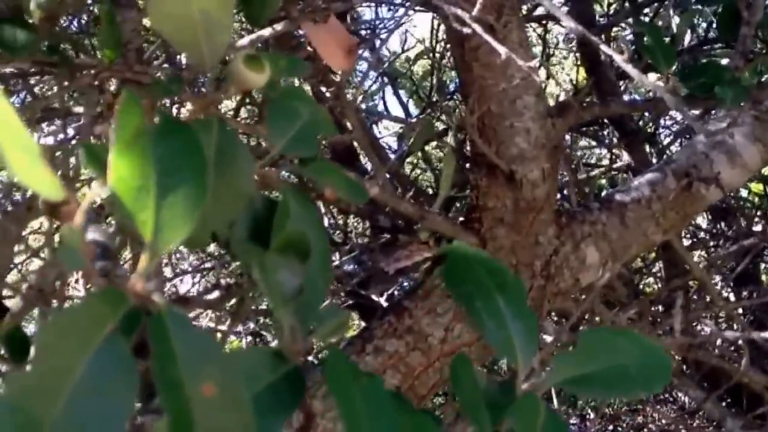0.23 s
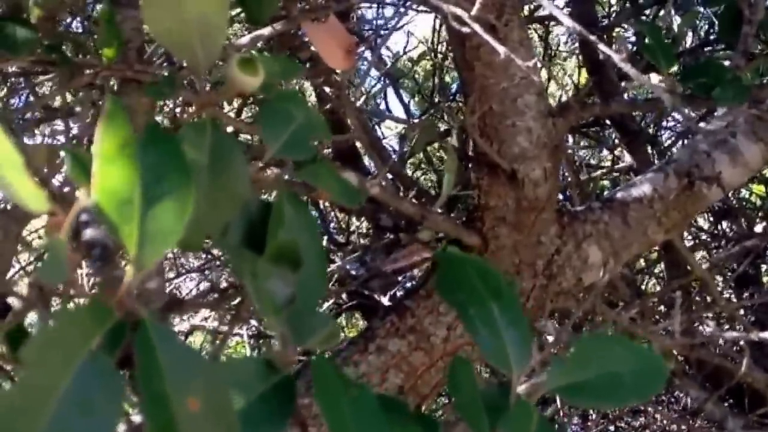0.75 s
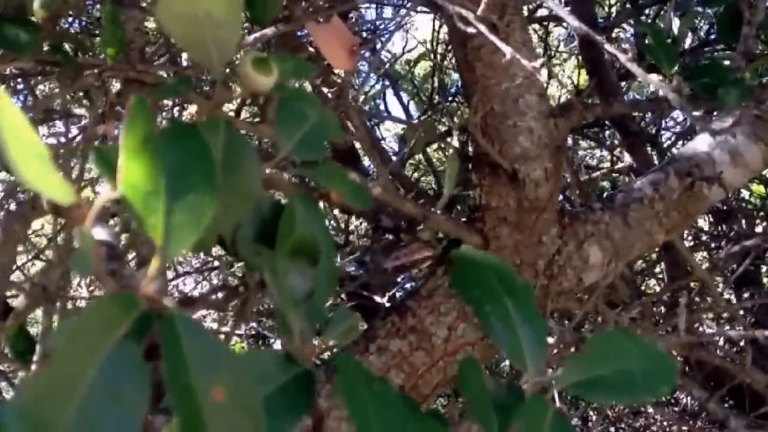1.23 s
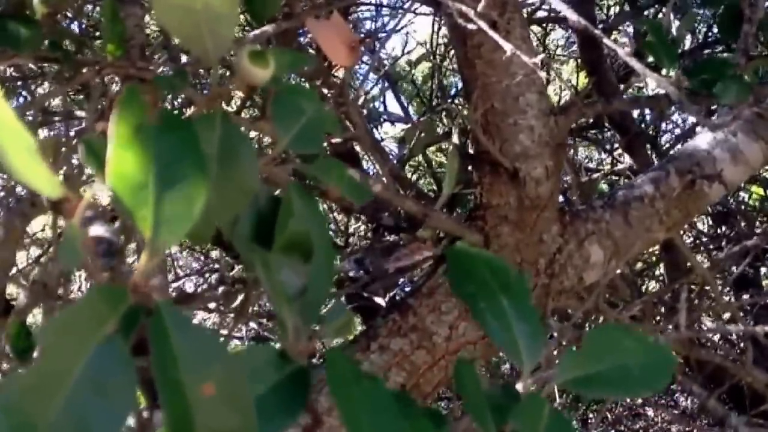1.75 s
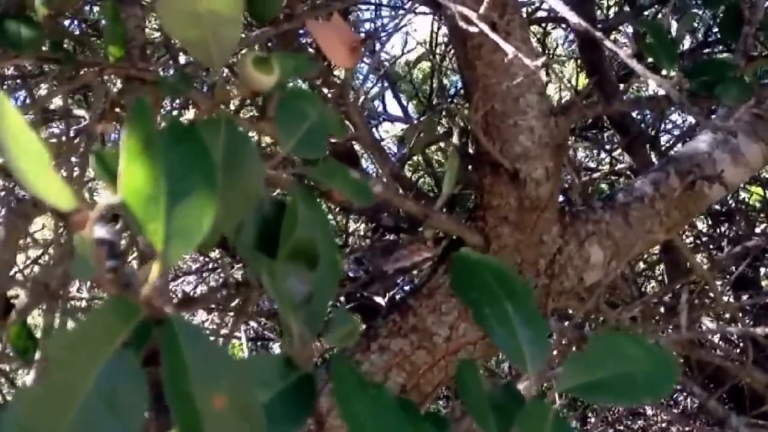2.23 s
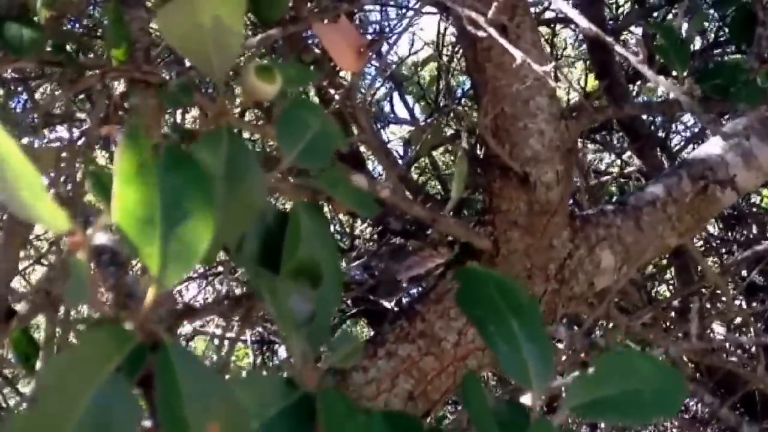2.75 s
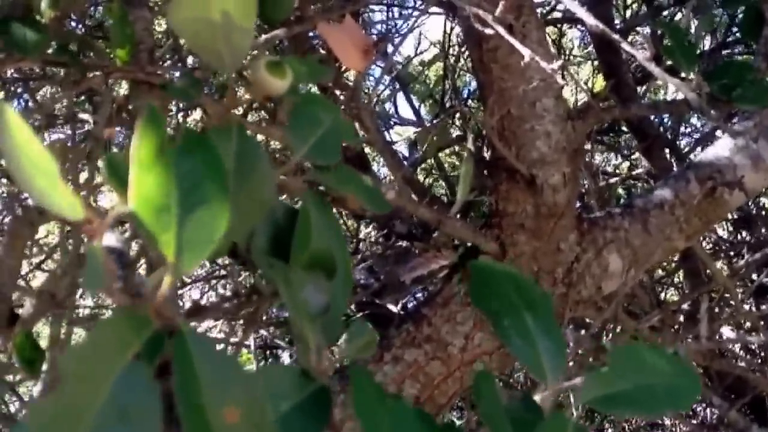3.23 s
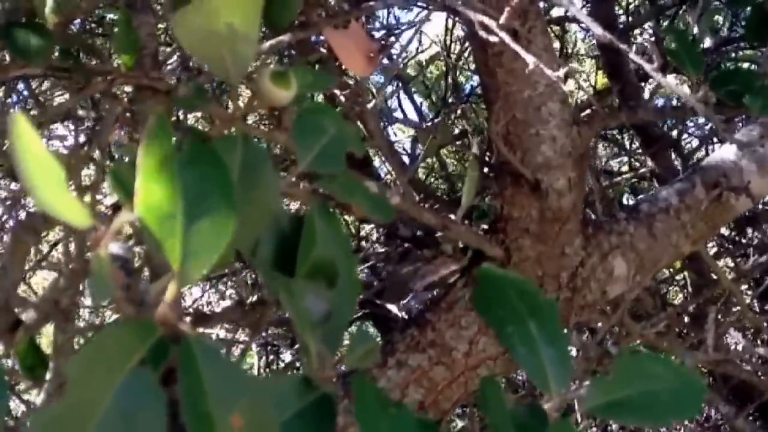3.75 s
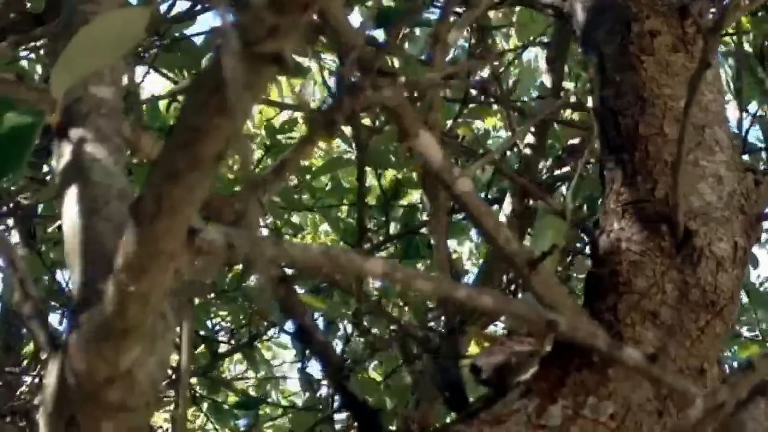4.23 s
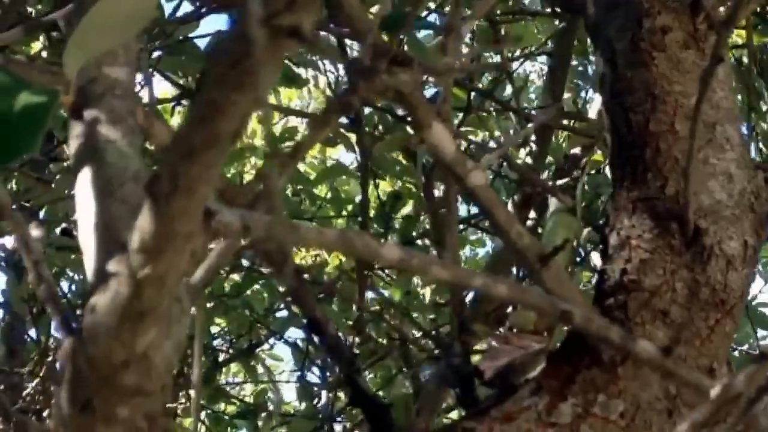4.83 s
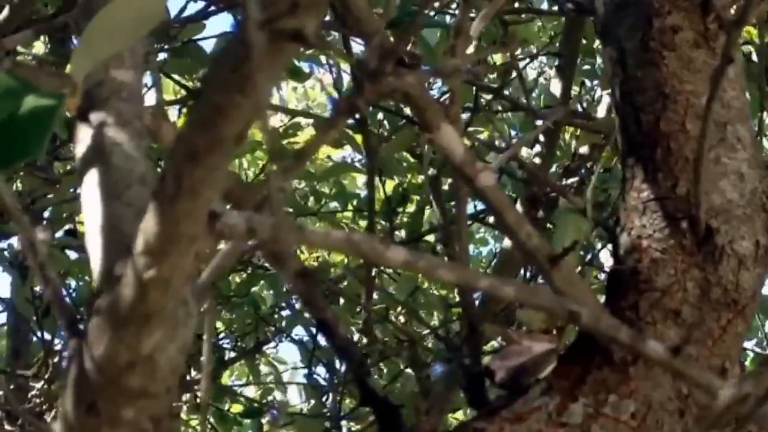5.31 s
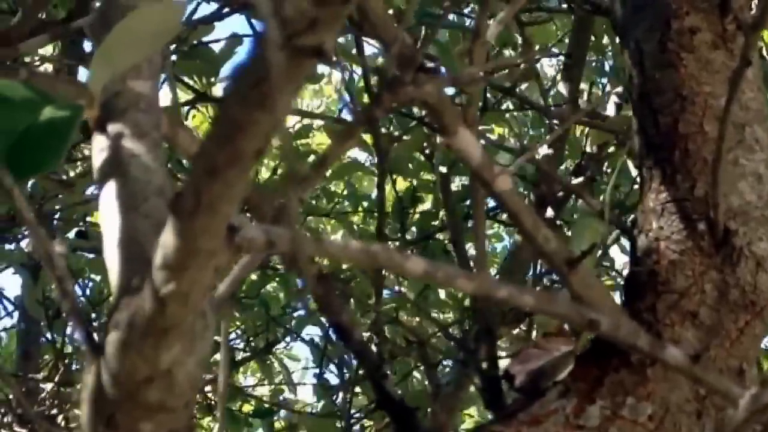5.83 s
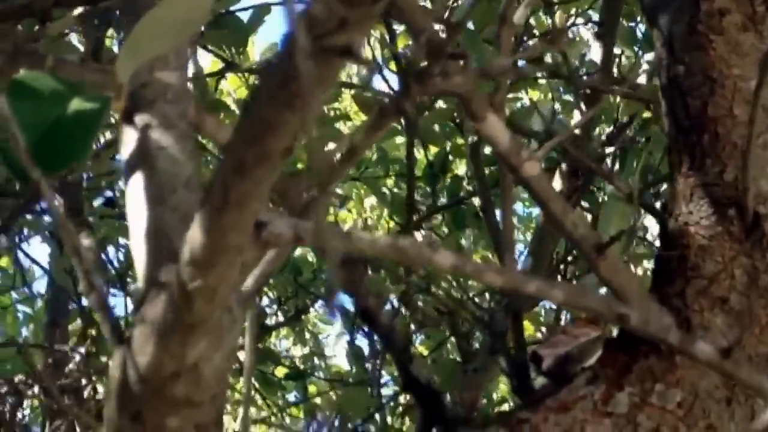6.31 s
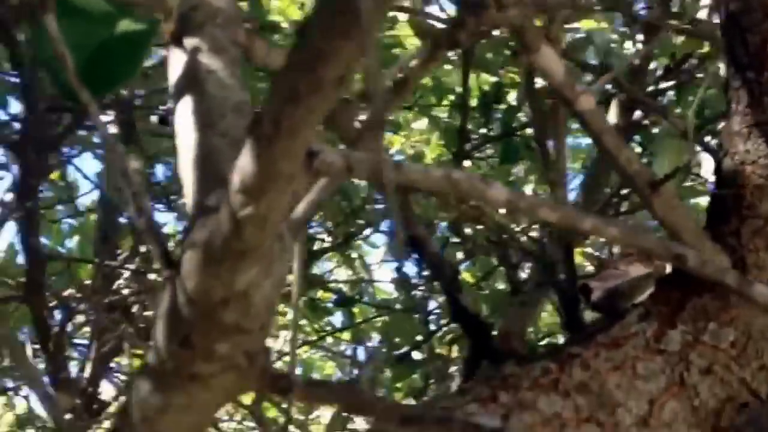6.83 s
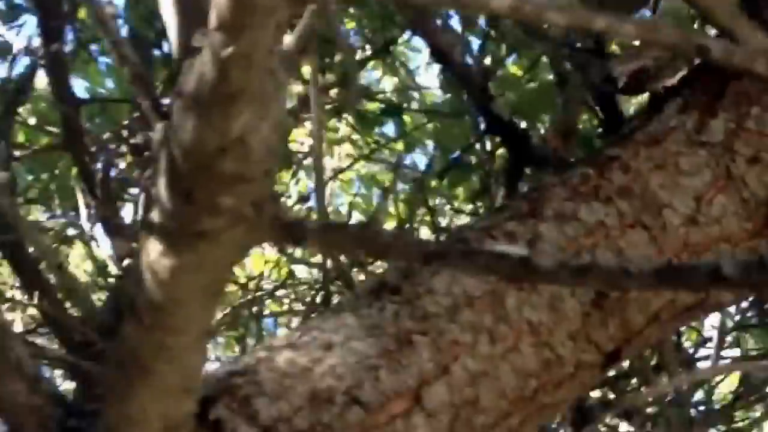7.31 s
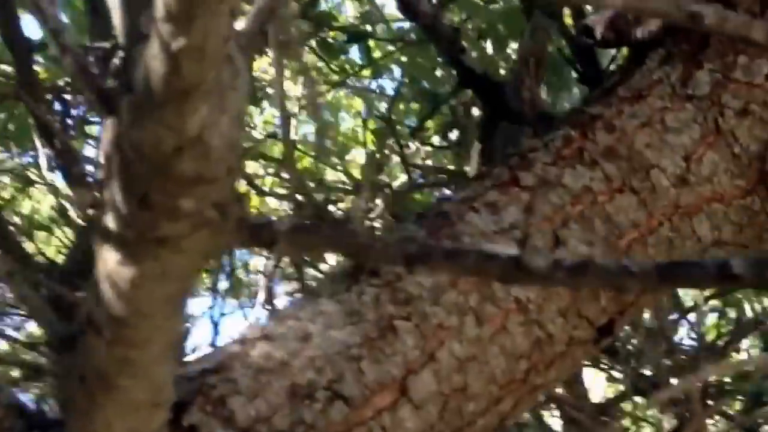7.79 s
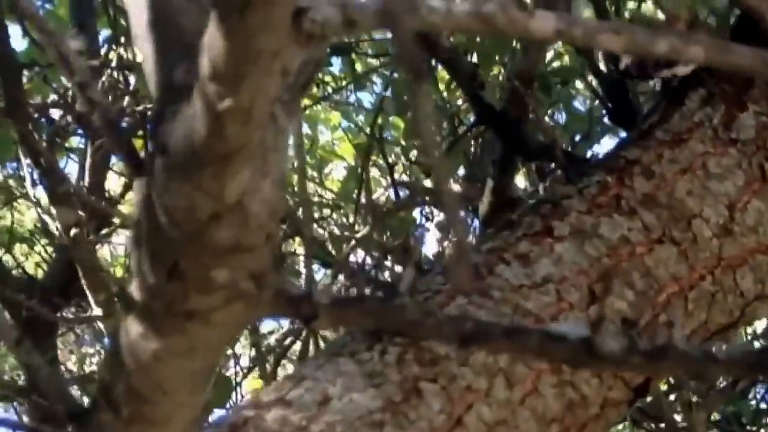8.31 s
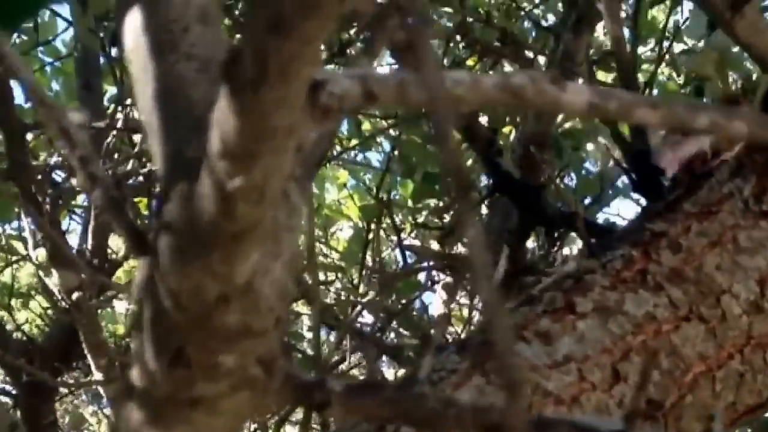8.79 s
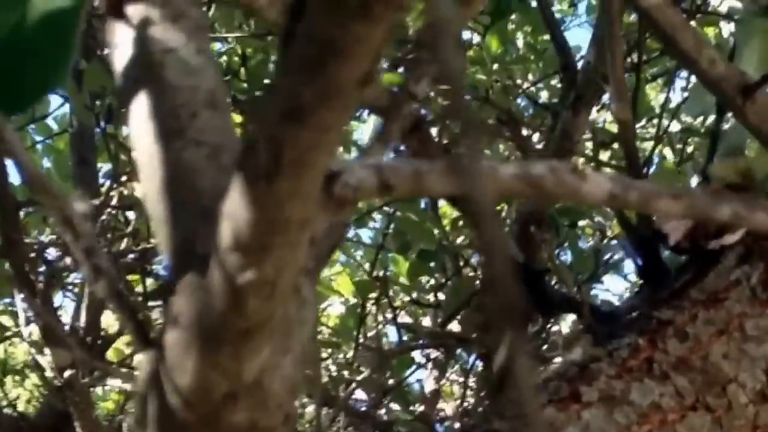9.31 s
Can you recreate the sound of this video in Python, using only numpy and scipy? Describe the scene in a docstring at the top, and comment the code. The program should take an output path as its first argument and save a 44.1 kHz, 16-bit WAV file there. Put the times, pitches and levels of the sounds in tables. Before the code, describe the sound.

Close, shrill cicada buzzing sputters out and returns as a loud scream, amid wing flicks, snapping twigs and light wind on the microphone.

```python
"""A cicada caught in a tree buzzes, breaks into stutters, then screams close to the microphone.
Its two tymbals buckle rib by rib, each rib a ringing click; wings flick the bark and branches
scatter the sound. Twigs snap, wind bumps the microphone, a far engine hums over the outdoor wash.
All sound drops out briefly near 4 s."""
import sys
import numpy as np
from scipy import signal
from scipy.fft import rfft, irfft, next_fast_len
from scipy.io import wavfile
from scipy.ndimage import uniform_filter1d

SR = 44100
rng = np.random.default_rng(int(sys.argv[2]) if len(sys.argv) > 2 else 0)


def unload_wav(signal):
    """Save mono or channel-first audio to the path in sys.argv[1] as 16-bit WAV at rate SR, clipped to [-1, 1]."""
    wavfile.write(
        sys.argv[1],
        SR,
        np.round(np.clip(np.atleast_2d(signal).T, -1, 1) * 32767).astype(np.int16),
    )


N = 421155
TIME = np.arange(N) / SR
DROPOUT_START_S, DROPOUT_END_S = 3.988, 4.034

# outdoor wash spectrum: freq_hz, gain_db
WASH_SPECTRUM = [(25, -34), (60, -20.5), (110, -7), (200, -4), (300, -0.5), (420, -1.5), (560, -9.5),
                 (1000, -9.5), (1500, -13), (2300, -19.5), (5000, -25), (7500, -24.5), (10000, -32.5),
                 (15000, -33.5)]
# narrow humps on it: centre_hz, width_hz, gain_db
WASH_HUMPS = [(362, 4.4, 6.5), (739, 49, 8.4)]
# wind bumps on the microphone: centre_s, level_db, width_s
GUSTS = [(0.325, -33, .012), (.946, -41.5, 0.031), (1.055, -30.5, 0.024), (1.85, -42.5, .038),
         (1.968, -36, .025), (2.096, -36, 0.015), (2.545, -30.5, 0.032), (2.629, -30.5, .028),
         (3.08, -38, .03), (3.186, -33.5, 0.017), (3.28, -43.5, .04), (5.222, -47.5, .03),
         (6.27, -43, 0.033)]
# far engine: time_s, pitch_hz, level_db
ENGINE_CURVE = [(4.8, 136, -72), (5.1, 130.5, -56), (5.45, 124.5, -56), (7.05, 132.5, -51.5),
                (9.0, 145.2, -56.5), (9.3, 145, -70)]
# echoes off nearby branches: delay_s, gain_db
BRANCH_ECHOES = [(.0031, -18), (.0052, -22.5)]
# twig snaps: start_s, level_db, ring_hz, relative_crack_db
TWIG_SNAPS = [(6.364, -12.5, 1380, -17), (6.4152, -20.5, 1500, -11), (6.4619, -17, 1620, -15),
              (6.555, -24, 891, -5), (7.001, -1.5, 1060, -27), (7.027, -21.5, 1400, -8),
              (7.304, -17, 1000, -8), (7.309, -6.5, 1820, -11), (7.319, -17, 1600, -12)]
# bouts of wing flicks: start_s, level_db, flick_count, spacing_s
WING_BOUTS = [(.3172, -22, 4, .0248), (.4394, -19, 1, 0), (.8894, -22, 1, 0), (1.0405, -16, 1, 0),
              (1.1194, -19, 2, .0249), (3.503, -32.5, 3, .0157), (3.945, -30, 3, .0148),
              (8.3494, -15, 1, 0), (8.5875, -14, 1, 0), (8.8771, -17, 1, 0), (9.0992, -14.5, 1, 0)]

# ribs of one stroke (quick tymbal, slow, slow at full effort): delay_s, gain_db, pitch_ratio, treble_db
QUICK_RIBS = [(0, -2.5, 0.986, 0.5), (.00108, -0.5, 1.021, .5), (.00213, -1.5, .99, -3.5)]
SLOW_RIBS = [(0, -2, .96, 1), (.0019, -1, 1, 0), (.0033, -3.5, 1.04, -1)]
HARD_RIBS = [(0, 0, 1.003, 3), (.0018, -1, 0.996, -3.5), (.0036, -2, .99, 0.5)]
# click spectra through the abdomen (buzz and early stutters, late stutters, scream): freq_hz, gain_db
BUZZ_SPECTRUM = [(200, -66), (2200, -34), (2700, -11.5), (3100, -2.5), (3550, 1.5), (4750, 0), (5050, -12),
                 (5700, -14), (6850, -8.5), (7600, -12), (8250, -6), (10000, -20), (11300, -14.5),
                 (15300, -26)]
LATE_STUTTER_SPECTRUM = [(200, -70), (2250, -32), (2850, -12), (3400, -5), (3800, -6.5), (4600, -6),
                         (5100, -18.5), (7200, -16), (7700, -13.5), (8300, -10), (9200, -33),
                         (11000, -17.5), (14000, -19.5), (15300, -18)]
SCREAM_SPECTRUM = [(200, -64), (1400, -47.5), (2300, -23), (3100, -10.5), (3900, -6.5), (4750, -2),
                   (5150, -8), (6000, -17), (6800, -13.5), (7600, -14.5), (8100, -9.5), (9500, -26.5),
                   (12500, -19.5), (15300, -26.5)]

# short runs of strokes: start_s, stroke_count
STUTTER_RUNS = [(.001, 2), (.023, 3), (.064, 2), (.086, 2), (.13, 1), (1.338, 1), (1.357, 1), (2.626, 1),
                (2.642, 4), (2.683, 2), (2.714, 2), (2.764, 1), (2.825, 1), (3.564, 9), (3.905, 2),
                (4.035, 8), (4.1, 3), (4.132, 2), (4.164, 2), (4.188, 10), (4.271, 2), (4.294, 4),
                (4.329, 1), (4.345, 3), (4.378, 1), (4.396, 3), (4.426, 2), (4.47, 2), (4.6186, 1),
                (4.639, 6), (4.745, 1), (4.767, 1), (4.802, 1), (4.834, 1), (4.857, 1), (4.915, 1),
                (4.956, 1), (4.991, 1), (5.049, 1), (5.443, 1), (5.492, 1), (6.045, 1), (6.749, 2),
                (6.884, 1), (6.908, 4), (6.94, 1)]
# stutter strength: time_s, level_db
STUTTER_CURVE = [(.1, -28), (1.34, -27.5), (2.63, -32), (2.73, -28.5), (3.9, -28.5), (4.03, -22.5),
                 (4.9, -25), (5.4, -27), (6.9, -29)]
# buzz strength: time_s, level_db, treble_db
BUZZ_CURVE = [(.17, -32, -10), (.27, -29, -13), (.35, -25.5, -9.5), (.75, -22, -15.5), (.83, -25.5, -12),
              (1.08, -22.5, -9), (1.3, -23.5, -12.5), (1.44, -29.5, -12.5), (2.1, -29.5, -13),
              (2.63, -33.5, -12)]
# muscle pace of one tymbal in the buzz: time_s, stroke_rate_hz
BUZZ_PACE = [(.17, 84), (.35, 109), (.75, 116), (.81, 94), (.9, 113), (1.27, 115), (1.34, 92), (2.05, 90),
             (2.631, 72)]
# faster muscles pull the tymbals closer and steadier: stroke_rate_hz, lag_cycles, jitter_cycles
BUZZ_LOCKING = [(74.5, .48, .033), (99.9, .44, .03), (116, .35, .011)]
# both muscles stall, more often as they tire: start_s, end_s
BUZZ_STALLS = [(.786, 0.79), (1.318, 1.35), (2.24, 2.237), (2.278, 2.28), (2.354, 2.35), (2.469, 2.481),
               (2.491, 2.501), (2.617, 2.64)]
# scream strength and pace of one tymbal: time_s, level_db, treble_db, stroke_rate_hz
SCREAM_CURVE = [(6.95, -31, -10, 86), (7.03, -20.7, -14.5, 102), (7.13, -18, -17, 106.3),
                (7.7, -17, -15.5, 111.3), (8.3, -18, -15.5, 112.5), (8.67, -22.5, -16, 105),
                (9.15, -22, -16.5, 107), (9.45, -23.5, -16, 108), (9.55, -26.5, -12, 100)]
# lower resonance, gliding slowly: time_s, pitch_hz
SCREAM_GLIDE = [(6.98, 3110), (7.2, 3500), (7.72, 3380), (8.05, 3480), (8.25, 3250), (8.5, 3080),
                (9.1, 3100), (9.55, 3170)]
# tiring tymbals drift apart: time_s, lag_cycles, jitter_cycles, resonance_share
SCREAM_FATIGUE = [(8.2, .36, .0065, 1), (8.75, .42, .027, 0.64)]


def amp(db):
    return 10 ** (np.asarray(db) / 20)


def spectrum_at(points, hz):
    """Interpolate on a log-frequency axis."""
    freq_hz, value = np.transpose(points)
    return np.interp(np.log(hz + 1), np.log(freq_hz + 1), value)


def follow(rows, at):
    """Interpolate a table's other columns along its first."""
    axis, *columns = np.transpose(rows)
    return [np.interp(at, axis, column) for column in columns]


def add(mix, start_s, sound):
    part = mix[max(round(start_s * SR), 0):][:len(sound)]
    part += sound[:len(part)]


def hump(x, centre, width):
    return np.exp(-.5 * ((x - centre) / width) ** 2)


def noise(colour_db):
    """Unit-rms noise with spectrum colour_db(hz)."""
    size = next_fast_len(N)
    gain = amp(colour_db(np.fft.rfftfreq(size, 1 / SR)))
    x = irfft(rfft(rng.standard_normal(size)) * gain, size)[:N]
    return x / np.sqrt(np.mean(x ** 2) + 1e-20)


def drift(rate_hz):
    """Unit-rms wander below about rate_hz."""
    return noise(lambda hz: -40 * np.log10(1 + (hz / rate_hz) ** 2))


def lingering(shape, memory):
    """Random values correlated from one stroke (row) to the next."""
    fresh = rng.standard_normal(shape)
    return signal.lfilter([np.sqrt(1 - memory ** 2)], [1, -memory], fresh, axis=0, zi=memory * fresh[-1:])[0]


def wash(level_db=-46.5, swell_db=1.26):
    """Broad outdoor noise, swelling slightly."""
    def colour_db(hz):
        humps_db = sum(db * hump(hz, centre_hz, width_hz) for centre_hz, width_hz, db in WASH_HUMPS)
        return spectrum_at(WASH_SPECTRUM, hz) + humps_db
    return noise(colour_db) * amp(level_db + swell_db * drift(3.6))


def wind(breeze_db=-52.5, swing_db=2, breeze_end_s=3.35, lump_db=2.5):
    """An uneven breeze that drops; gusts bump the microphone."""
    breeze = amp(breeze_db + swing_db * drift(5.2)) * np.clip((breeze_end_s - TIME) * 10, 0, 1)
    gusts = sum(amp(db) * hump(TIME, centre_s, width_s) for centre_s, db, width_s in GUSTS)
    colour = [(30, -36), (70, -15.5), (125, .5), (190, 3.5), (300, -7), (600, -27.5), (2000, -50)]
    rumble = noise(lambda hz: spectrum_at(colour, hz))
    return rumble * np.hypot(breeze, gusts) * amp(lump_db * drift(28))


def engine(wobble=.0042, swing_db=1):
    """A far hum that sags, then slowly speeds up."""
    pitch_hz, level_db = follow(ENGINE_CURVE, TIME)
    cycles = np.cumsum(pitch_hz * (1 + wobble * drift(5.4))) / SR
    return np.sqrt(2) * amp(level_db + swing_db * drift(4)) * np.sin(2 * np.pi * cycles)


def canopy(x, near_db=-11, near_t60_s=.07, far_db=-29, far_t60_s=.59, sway_hz=.7, tails=4):
    """Two branches echo; leaves scatter a tail that changes as the microphone sways."""
    t, out = TIME[:SR // 3], x.copy()
    for delay_s, db in BRANCH_ECHOES:
        add(out, delay_s, amp(db) * x)
    decays = (t > .002) * amp(-60 * t / np.array([[near_t60_s], [far_t60_s]]))
    for k in range(tails):
        near, far = rng.standard_normal((2, len(t))) * decays
        tail = amp(near_db) * near / np.linalg.norm(near) + amp(far_db) * far / np.linalg.norm(far)
        sway = np.cos(2 * np.pi * sway_hz * (1 + k // 2) * TIME + k * np.pi / 2) * np.sqrt(2 / tails)
        out += signal.oaconvolve(x * sway, tail)[:N]
    return out


def twigs(ring_t60_s=.0044, crack_t60_s=.0089, upper_db=-8, upper_ratio=2.36):
    """Each snap: two heavily damped wood modes and a brief crack."""
    out, t = np.zeros(N), TIME[:1200]
    fade = amp(-60 * t / crack_t60_s)
    for start_s, db, ring_hz, crack_db in TWIG_SNAPS:
        phase = 2 * np.pi * ring_hz * t
        modes = np.sin(phase + 1) + amp(upper_db) * np.sin(phase * upper_ratio)
        crack = signal.lfilter([1], [1, -.75], rng.standard_normal(len(t))) * fade
        crack *= amp(crack_db - 3) * np.linalg.norm(fade) / np.linalg.norm(crack)
        add(out, start_s, amp(db) * (modes * amp(-60 * t / ring_t60_s) + crack))
    return signal.sosfilt(signal.butter(2, 620, "high", fs=SR, output="sos"), out)


def wings(t60_s=.042, trim_db=-3.5):
    """Dry scratches of a wing on bark, singly or in even bouts."""
    envelope, t = np.zeros(N), TIME[:2000]
    for start_s, db, count, spacing_s in WING_BOUTS:
        for k in range(round(count)):
            add(envelope, start_s + k * spacing_s, amp(db + trim_db - 60 * t / t60_s))
    colour = [(150, -35), (800, -11), (2500, -10), (4000, -3), (8000, 1), (15000, 2)]
    return envelope * noise(lambda hz: spectrum_at(colour, hz))


def muscles(pace, coupling, slow_ribs, slow_db=0):
    """Strokes of two tymbals; coupling(time_s, rate_hz) gives the slow one's lag and the jitter."""
    t = np.arange(pace[0][0], pace[-1][0], 1 / SR)
    cycles = np.cumsum(follow(pace, t)[-1]) / SR
    beat_s = np.interp(np.arange(int(cycles[-1]) + 1), cycles, t)
    rate_hz, count = follow(pace, beat_s)[-1], len(beat_s)
    lag, jitter = coupling(beat_s, rate_hz)
    quick, slow = jitter * rng.standard_normal((count, 2)).T
    strokes_s = np.r_[beat_s + quick / rate_hz, beat_s + (lag + slow) / rate_hz]
    gains = np.repeat([1, amp(slow_db)], count)
    return strokes_s, gains, np.repeat([QUICK_RIBS, slow_ribs], count, axis=0)


def minimum_phase(gain_db):
    """Complex spectra that ring only after the click."""
    cepstrum = irfft(gain_db * np.log(10) / 20)
    half = cepstrum.shape[1] // 2
    cepstrum[:, 1:half] *= 2
    cepstrum[:, half + 1:] = 0
    return np.exp(rfft(cepstrum))


def buckle(strokes_s, gains, ribs, colour_db, slip_s, detune, crinkle, crinkle_s, memory, scatter_db=0):
    """Each stroke buckles the ribs in turn; each rib clicks and rings much as it did last time."""
    size = 512
    out, hz = np.zeros(N), np.fft.rfftfreq(size, 1 / SR)
    fade = np.exp(-TIME[:size] / crinkle_s)
    crumple_share = crinkle * spectrum_at([(2000, .9), (3000, .4), (5000, .42), (9000, .9)], hz)
    for delay_s, rib_db, pitch_ratio, treble_db in np.moveaxis(ribs, 0, -1):
        late, sharp, strong = lingering((len(strokes_s), 3), memory).T
        tuning = pitch_ratio * (1 + detune * sharp)
        tilt_db = treble_db[:, None] * spectrum_at([(4600, .13), (6000, .87)], hz)
        ring = minimum_phase(colour_db(hz, tuning[:, None]) + tilt_db)
        # the membrane crumples briefly after giving way
        crumple = rfft(lingering((len(strokes_s), size), memory) * fade / np.linalg.norm(fade))
        force = np.sqrt(1 - crumple_share ** 2) + crumple_share * crumple
        onsets = (strokes_s + delay_s + slip_s * late) * SR
        subsample_delay = np.exp(-2j * np.pi * hz / SR * (onsets % 1)[:, None])
        clicks = irfft(force * ring * subsample_delay)
        clicks *= (gains * amp(rib_db + scatter_db * strong) / np.linalg.norm(clicks, axis=1))[:, None]
        for onset, click in zip(np.floor(onsets), clicks):
            add(out, onset / SR, click)
    return out


def at_level(x, level_db):
    """Bring the strongest stretches to level_db rms; dips remain."""
    power = uniform_filter1d(x ** 2, size=2205)
    return x * amp(level_db) / np.sqrt(np.maximum(power, .82 * power.max()))


def brightened(spectrum, hz, treble_db, usual_db):
    """Harder buckling adds treble above the ringing band."""
    shelf = spectrum_at([(5000, 0), (8500, .73), (12000, 1)], hz)
    return spectrum_at(spectrum, hz) + (treble_db[:, None] - usual_db) * shelf


def stutter(spacing_s=.007, ring_db=7, ring_hz=4340, width_hz=105, click_db=19):
    """Lone tymbal strokes and short runs, ringing more after the dropout."""
    strokes_s = np.concatenate([s + spacing_s * np.arange(round(count)) for s, count in STUTTER_RUNS])
    gains = amp(follow(STUTTER_CURVE, strokes_s)[0] + click_db)

    def colour_db(hz, tuning):
        resonance_db = ring_db * hump(hz, ring_hz * np.sqrt(tuning), width_hz)
        late_db = spectrum_at(LATE_STUTTER_SPECTRUM, hz) + resonance_db
        return np.where(strokes_s[:, None] < DROPOUT_START_S, spectrum_at(BUZZ_SPECTRUM, hz), late_db)
    return buckle(strokes_s, gains, [SLOW_RIBS] * len(strokes_s), colour_db, slip_s=.000121,
                  detune=.0088, crinkle=.97, crinkle_s=.0014, memory=.6, scatter_db=.55)


def buzz(ring_db=6, ring_hz=3970, width_hz=80):
    """The two tymbals run close, then tire, fall into alternation and stall now and then."""
    strokes_s, gains, ribs = muscles(
        BUZZ_PACE, lambda _, rate_hz: follow(BUZZ_LOCKING, rate_hz), SLOW_RIBS, slow_db=.5)
    for start_s, end_s in BUZZ_STALLS:
        gains[(strokes_s > start_s) & (strokes_s < end_s)] = 0
    treble_db = follow(BUZZ_CURVE, strokes_s)[1]

    def colour_db(hz, tuning):
        resonance_db = ring_db * hump(hz, ring_hz * tuning, width_hz)
        return brightened(BUZZ_SPECTRUM, hz, treble_db, usual_db=-13.5) + resonance_db
    clicks = buckle(strokes_s, gains, ribs, colour_db, slip_s=.00006,
                    detune=.011, crinkle=.97, crinkle_s=.002, memory=.75)
    return at_level(clicks, follow(BUZZ_CURVE, TIME)[0])


def scream(ring_db=8, between_db=.5, width_hz=115, glide_share=.89):
    """Full effort: the tymbals lock and two resonances glide, fading as the cicada tires."""
    strokes_s, gains, ribs = muscles(
        SCREAM_CURVE, lambda time_s, _: follow(SCREAM_FATIGUE, time_s)[:2], HARD_RIBS)
    treble_db = follow(SCREAM_CURVE, strokes_s)[1]
    lower_hz = follow(SCREAM_GLIDE, strokes_s[:, None])[0]
    main_hz = 4352 + glide_share * (lower_hz - 3420)
    resonance_share = follow(SCREAM_FATIGUE, strokes_s[:, None])[2]

    def colour_db(hz, tuning):
        peaks_db = sum(ring_db * hump(hz / tuning, peak_hz, width_hz) for peak_hz in (lower_hz, main_hz))
        peaks_db += between_db * hump(hz, (lower_hz + main_hz) / 2, width_hz)
        body_db = brightened(SCREAM_SPECTRUM, hz * np.sqrt(4300 / main_hz), treble_db, usual_db=-15.5)
        return body_db + resonance_share * peaks_db
    clicks = buckle(strokes_s, gains, ribs, colour_db, slip_s=.00006,
                    detune=.0045, crinkle=.81, crinkle_s=.0009, memory=.88)
    return at_level(clicks, follow(SCREAM_CURVE, TIME)[0])


def scene():
    cicada = buzz() + stutter() + scream() + wings()
    return (canopy(cicada) + twigs() + wash() + wind() + engine())[None]


def record(dry):
    """Brief dropout, then a low-pass."""
    gate = uniform_filter1d(1. * ((TIME < DROPOUT_START_S) | (TIME > DROPOUT_END_S)), size=40)
    lowpass = signal.firwin(401, cutoff=15450, window=("kaiser", 8), fs=SR)
    return signal.oaconvolve(dry * gate, lowpass[None], "same")


dry = scene()
out = record(dry)
unload_wav(out)
```